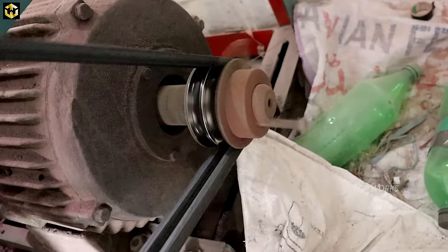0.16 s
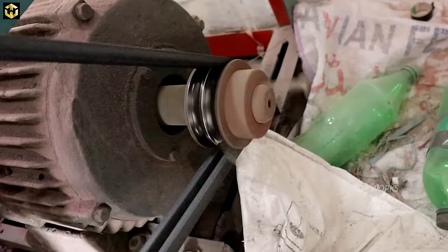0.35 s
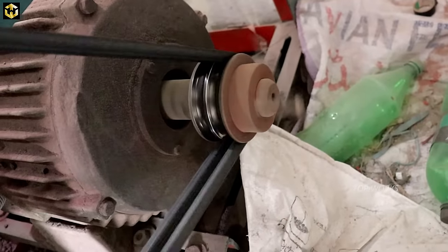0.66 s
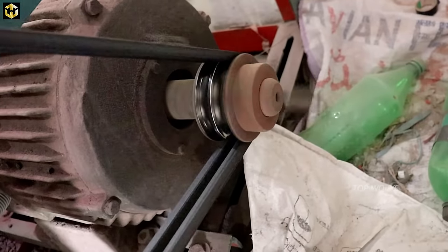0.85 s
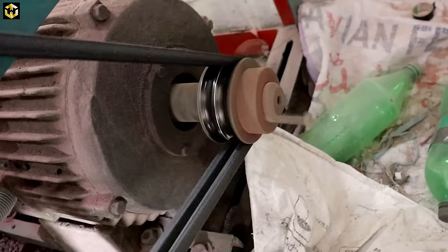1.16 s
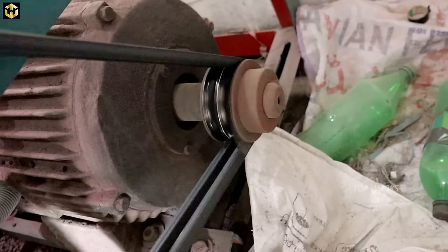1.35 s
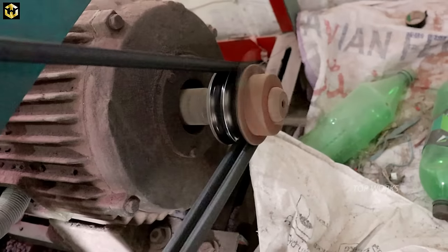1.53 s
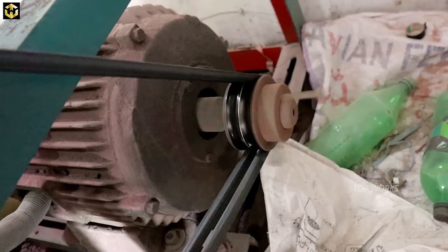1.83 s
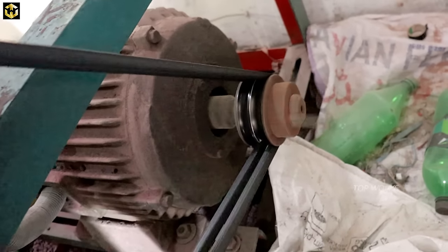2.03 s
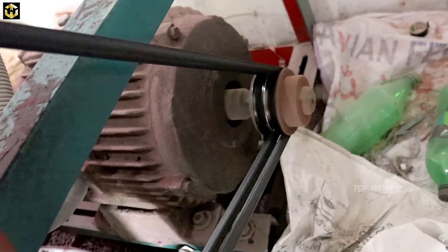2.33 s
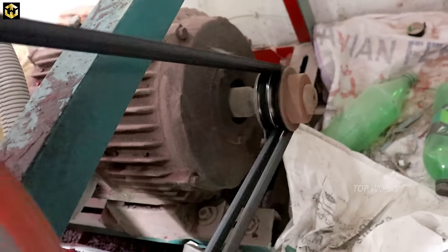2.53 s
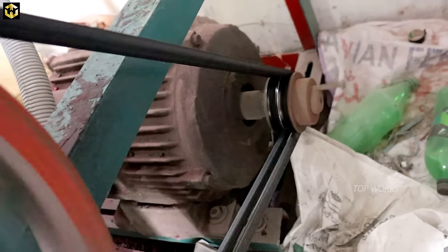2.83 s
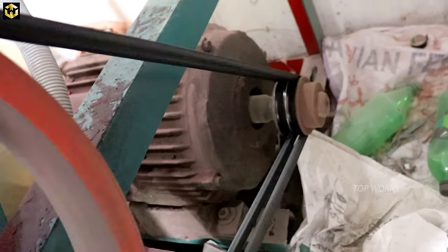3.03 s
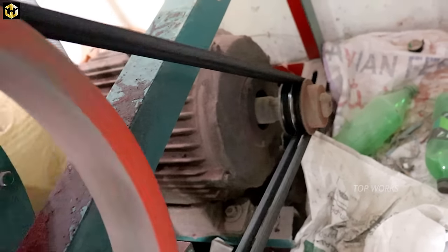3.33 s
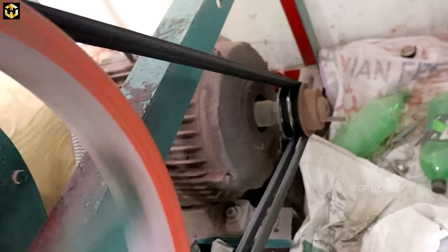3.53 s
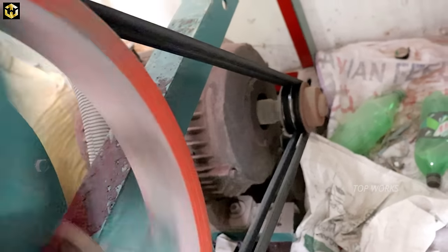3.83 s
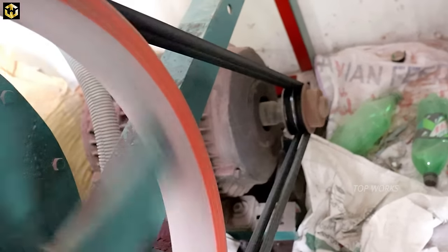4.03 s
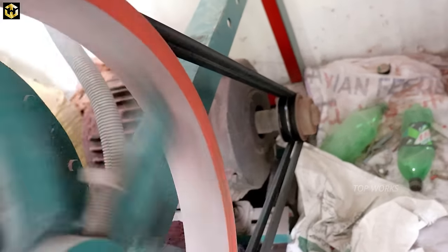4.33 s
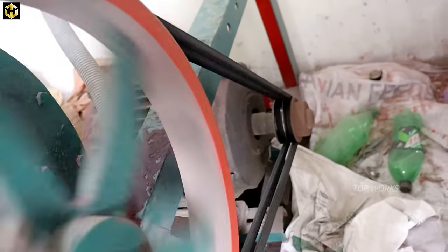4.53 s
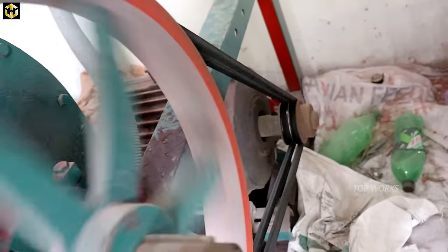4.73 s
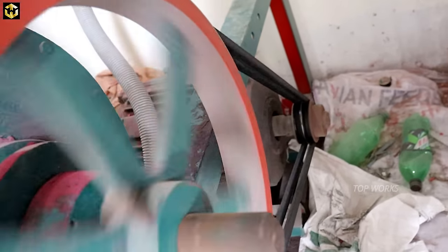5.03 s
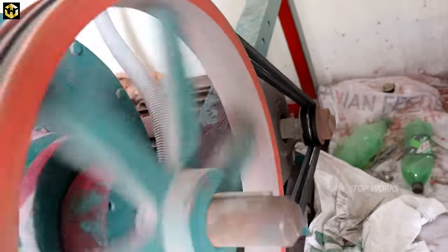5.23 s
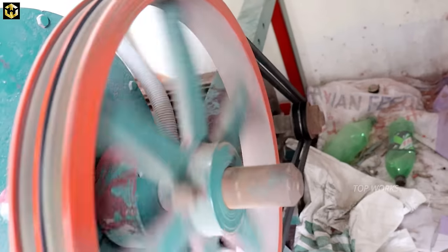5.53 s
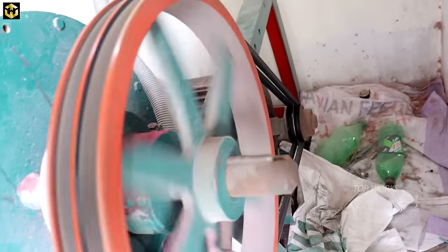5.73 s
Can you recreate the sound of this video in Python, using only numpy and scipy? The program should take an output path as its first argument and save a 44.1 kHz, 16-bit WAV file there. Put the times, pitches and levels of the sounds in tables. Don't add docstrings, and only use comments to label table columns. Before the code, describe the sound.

Steady motor and drum noise with uneven swishing, clattering tumbles and small steel rings, starting full and turning thinner and quieter.

```python
import sys
import numpy as np
from scipy import signal
from scipy.io import wavfile
from scipy.ndimage import uniform_filter1d

SR = 44100
rng = np.random.default_rng(int(sys.argv[2]) if len(sys.argv) > 2 else 0)


def invert_db(level):
    return 10 ** (np.asarray(level, dtype=float) / 20)


def waveform_to_disk(signal):
    frames = np.transpose(np.atleast_2d(signal))
    scaled = np.clip(frames, -1, 1) * 32767
    samples = np.round(scaled).astype(np.int16)
    wavfile.write(sys.argv[1], SR, samples)


N = 259308


def evened(x):
    return x / np.sqrt(np.mean(x ** 2) + 1e-20)


def read(points, hz):
    f, value = np.transpose(points)
    return np.interp(np.log(hz + 1), np.log(f + 1), value)


def add(mix, start_s, sound):
    part = mix[max(round(start_s * SR), 0):][:len(sound)]
    part += sound[:len(part)]


def patches(frames, bins, long, wide):
    noise = rng.standard_normal((frames, bins))
    return evened(uniform_filter1d(uniform_filter1d(noise, long, 0), wide, 1)).T


def away(t):
    return np.clip(t / 3.65, 0, 1)


# hz, likeness
LIKENESS = [(60, 0.43), (150, 0.89), (380, 0.52), (950, 0.0035), (2380, -0.01), (5980, 0.00072),
            (15000, -0.12)]


def port_noise(frames, hz):
    lead_s = 0.00021
    a, b, c, d = rng.standard_normal((frames, len(hz), 4)).T
    same = np.sqrt(np.clip(read(LIKENESS, hz), 0, 1))[:, None]
    left = a + 1j * b
    late = np.exp(-2j * np.pi * lead_s * hz)[:, None]
    right = same * left * late + np.sqrt(1 - same ** 2) * (c + 1j * d)
    return np.array([left, right]), same


# hz, width_hz, near_motor_db, near_wheel_db
SHELL = [(71, 10, 6, 4.5), (109, 11, 3, 7.5), (159.6, 4.4, 11, 13), (217.5, 9, 12, 1), (286, 7.7, 4, 4.5),
         (323.5, 13, 11, 0), (332, 21, -7, 9.5), (474, 7.8, 5, -12), (537, 28, 7, -3), (647, 26, 8, 2),
         (722, 19, 7, 8.5), (820, 11, -1, 6), (873, 12, 4.5, -6), (997, 25, 5.5, 0), (1100, 6.3, 11, 3),
         (1235, 15, 12.5, 5.5), (1290, 18, -1, 6), (1524, 17, 3.5, 6), (1640, 9.2, 4, 7), (1933, 57, 1, 1),
         (2070, 16, -1, 3.5), (2118, 24, 4.5, -0.5), (2240, 15.5, 3, -2.5), (3010, 25, -4, -12)]


def shell_power(hz, t, hop):
    waver_db = 3
    f, width_hz, near_db, far_db = np.transpose(SHELL)
    mode_db = near_db[:, None] + np.outer(far_db - near_db, away(t))
    mode_db = mode_db + waver_db * patches(len(t), len(f), round(4000 / hop), 1)
    peaks = 1 / (1 + (2 * (hz[:, None] - f) / width_hz) ** 2)
    return 1 + peaks @ invert_db(2 * mode_db)


# start_s, length_s, thump_db, splash_db
TUMBLES = [(0.225, 0.092, 2, 2.5), (0.39, 0.018, 2, 0), (0.64, 0.04, -0.5, 2.5), (0.804, 0.052, -1.5, -2.5),
           (0.848, 0.049, 4.5, -2.5), (1.126, 0.08, 3, 0), (1.334, 0.049, 1, 3.5), (1.495, 0.11, -5, -1),
           (1.68, 0.066, 3.5, 5), (1.897, 0.072, 2.5, 1), (2.18, 0.054, -2, -3.5), (2.334, 0.11, 4, 2),
           (2.475, 0.091, -1, 0.5), (2.575, 0.089, 4, 3.5), (2.85, 0.073, 4, 5), (3.008, 0.052, -4, -4),
           (3.111, 0.087, 4.5, 3), (3.548, 0.038, -1.5, 5), (3.607, 0.14, 7, 3.5), (3.765, 0.067, -3, -3.5),
           (3.835, 0.039, -6.5, 2.5), (4.062, 0.078, 6, 4), (4.19, 0.044, 6, 0.5), (4.38, 0.1, 2.5, 2.5),
           (4.592, 0.042, 1, 3.5), (4.77, 0.073, -3.5, 1), (4.965, 0.13, 4.5, -1), (5.21, 0.1, 6.5, 1.5),
           (5.406, 0.033, -1, 6.5), (5.5, 0.15, 0, -6.5)]


def tumbling(t):
    drop_s, settle_s = 0.011, 0.038
    start_s, length_s, *db = np.transpose(TUMBLES)
    since = t - start_s[:, None]
    rise = np.clip(since / drop_s + .5, 0, 1)
    settle = np.clip(1 - (since - length_s[:, None]) / settle_s, 0, 1)
    return np.array(db) @ (rise * settle)


# time_s, centre_hz
HOLLOW = [(0, 1720), (1.2, 1770), (2.2, 2170), (3.2, 1800), (4.3, 1820), (5.88, 1760)]


def mouth_power(hz, t):
    width_hz, sink_hz_per_db = 750, 6
    thump_db, splash_db = tumbling(t)
    centre_hz = np.interp(t, *np.transpose(HOLLOW)) - sink_hz_per_db * thump_db
    height_db = 5.5 - 0.58 * thump_db + 0.56 * splash_db
    return invert_db(2 * height_db / (1 + (2 * (hz[:, None] - centre_hz) / width_hz) ** 2))


# time_s, turned_away_db, right_port_shade_db
TURN = [(0, -0.5, 1.5), (1.2, 1.5, -0.5), (1.7, 0.7, -1), (2.05, -2, 5), (2.3, -2, 3), (2.75, -2, 6),
        (3.25, -1.5, 6), (3.55, -3, 3.5), (4.2, -1.5, 3.5), (4.75, -5, 2), (5.12, -2.5, 1), (5.45, -5, 2),
        (5.88, -6, -2)]
TURN_AT = [450, 750, 1700, 4000, 9000]
# start_left_minus_right_db, turn_share, shade_share
PORTS = [(7, 0.17, -0.054), (4, 1.3, 1.04), (4, 1.06, 0.064), (5, 0.071, 1.1)]


def port_difference_db(hz, t):
    time_s, turn_db, shade_db = np.transpose(TURN)
    bands = [0 * t]
    for start_db, turn_share, shade_share in PORTS:
        bands.append(np.interp(t, time_s, start_db + turn_share * turn_db + shade_share * shade_db))
    return np.array([np.interp(np.log(hz + 1), np.log(TURN_AT), row) for row in np.array(bands).T]).T


# centre_s, length_s, centre_hz, level_db
SWELLS = [(0.13, 0.09, 310, -1), (0.16, 0.061, 464, 7), (0.66, 0.09, 387, 11.5), (0.77, 0.068, 2120, 4),
          (1.12, 0.09, 1080, 5), (1.26, 0.056, 580, 7), (1.35, 0.12, 234, 2.5), (1.57, 0.18, 780, 5),
          (1.57, 0.12, 5500, 2.5), (1.58, 0.14, 1470, 4.5), (1.61, 0.054, 290, 5.5), (2.23, 0.16, 3530, -1),
          (2.86, 0.07, 1410, 7), (2.93, 0.13, 820, 7), (3.27, 0.064, 332, 5.5), (3.3, 0.1, 2380, 1),
          (3.3, 0.094, 10830, 5), (3.36, 0.051, 3770, 4), (3.42, 0.058, 352, 9), (3.59, 0.19, 520, 5.5),
          (3.84, 0.1, 240, 7), (3.86, 0.059, 1710, 3), (4.14, 0.096, 240, 7.5), (4.39, 0.13, 7160, 5),
          (4.49, 0.1, 1010, 2.5), (4.59, 0.18, 430, -3), (4.68, 0.13, 494, 6), (4.72, 0.074, 11570, 6),
          (4.85, 0.16, 5950, 4), (5.24, 0.17, 1020, 2), (5.35, 0.084, 2710, 2), (5.42, 0.084, 5960, 1),
          (5.43, 0.12, 1700, -3), (5.53, 0.11, 2230, 5), (5.67, 0.12, 403, 6), (5.68, 0.089, 3740, 3.5),
          (5.79, 0.12, 1200, 4), (5.88, 0.056, 240, 12)]
# centre_s, length_s, centre_hz, level_db
LULLS = [(0.26, 0.079, 1140, -2), (0.78, 0.13, 243, -5), (0.81, 0.22, 490, -1.5), (1.01, 0.25, 610, -6),
         (1.15, 0.54, 460, -4.5), (1.46, 0.16, 2780, -4), (1.76, 0.086, 1260, -7), (1.97, 0.11, 350, -3),
         (2.1, 0.076, 10140, -3.5), (2.15, 0.092, 590, -8), (2.24, 0.068, 1240, -4.5),
         (2.46, 0.055, 3750, -2), (2.53, 0.089, 426, -20), (2.61, 0.1, 960, -5.5), (2.77, 0.11, 830, -6),
         (2.87, 0.09, 330, -13), (2.94, 0.11, 2380, -3), (2.94, 0.17, 288, 1), (3.11, 0.11, 5250, -4.5),
         (3.17, 0.065, 2110, -6), (3.52, 0.14, 5600, -5), (3.65, 0.08, 10140, -6), (3.96, 0.085, 490, 0),
         (4.0, 0.08, 241, -9), (4.15, 0.11, 710, -10), (4.21, 0.15, 2440, -4), (4.5, 0.11, 240, -7),
         (4.61, 0.093, 1010, -7), (4.62, 0.16, 3000, -3), (4.85, 0.18, 740, -6), (5.0, 0.09, 240, -5),
         (5.07, 0.067, 1400, -6), (5.19, 0.15, 2230, -4.5), (5.34, 0.12, 8300, -6), (5.58, 0.09, 290, -4),
         (5.78, 0.14, 11300, -6), (5.88, 0.062, 1690, -9), (5.88, 0.16, 6390, -7)]


def heaps_db(hz, t):
    region_octaves = 0.46
    centre_s, length_s, centre_hz, level_db = np.transpose(list(SWELLS) + list(LULLS))
    octaves = np.log2((hz[:, None] + 1) / centre_hz)
    across = np.exp(-np.log(16) * (octaves / region_octaves) ** 2)
    along = np.exp(-np.log(16) * ((t - centre_s[:, None]) / length_s[:, None]) ** 2)
    return across * level_db @ along


def roar(colour_db, size, count, patch_db, broad_db, gust_db, own_db):
    hop = size // 4
    frames, hz = N // hop + 5, np.fft.rfftfreq(size, 1 / SR)[:count]
    t, bin_hz = np.arange(frames) * hop / SR, SR / size
    z, same = port_noise(frames, hz)
    ring = shell_power(hz, t, hop) * mouth_power(hz, t)
    small = patch_db * patches(frames, len(hz), round(3500 / hop), round(150 / bin_hz))
    broad = broad_db * patches(frames, len(hz), round(3000 / hop), round(1500 / bin_hz))
    gust = gust_db * patches(frames, 1, round(1200 / hop), 1)
    own = own_db * patches(frames, len(hz), round(3000 / hop), round(600 / bin_hz)) * (1 - same)
    lean = port_difference_db(hz, t) / 2 + own
    z *= np.sqrt(ring) * invert_db(colour_db(hz, t) + small + broad + gust + np.array([lean, -lean]))
    power = uniform_filter1d((abs(z.mean(0)) ** 2).sum(0), size=round(4500 / hop)) / 3
    z *= invert_db(heaps_db(hz, t)) / np.sqrt(power + 1e-20)
    z = np.pad(z, [(0, 0), (0, size // 2 + 1 - count), (0, 0)])
    return signal.istft(z, nperseg=size, noverlap=size - hop)[1][:, :N]


# hz, level_db
RUMBLE = [(15, -45), (25, -23), (102, -6), (156, -1.5), (177, -2.5), (216, -12.5), (260, 6.5), (340, -30),
          (570, -120)]
BODY_NEAR = [(120, -46), (200, -12.5), (313, -1), (435, -6), (524, 1), (567, -3), (851, 5), (1100, -7.5),
             (1430, -22), (2420, -120)]
BODY_FAR = [(120, -23), (200, -10.5), (296, -12), (334, -5), (372, -7.5), (827, 0.5), (914, -1.5),
            (1100, 1.5), (1430, -28), (2420, -120)]
SWISH_NEAR = [(530, -25), (900, 0), (1160, -6.5), (1260, 1.5), (1410, -3), (1610, -2.5), (2900, -7),
              (3770, -36), (6380, -120)]
SWISH_FAR = [(530, -42), (900, -7.5), (1270, -0.5), (1380, -1.5), (1680, -2), (2170, -7), (2900, -17.5),
             (3770, -30), (6380, -120)]
HISS_NEAR = [(1350, -21.5), (2300, -2), (2860, -4), (3090, -2), (5250, -6.5), (6790, -13), (10100, -18.5),
             (11500, -22.5), (14400, -26), (15600, -29)]
HISS_FAR = [(1350, -37), (2300, -1.5), (3630, -1), (3970, -2.5), (5340, -3), (6840, -8), (7540, -10),
            (10200, -14), (12100, -22), (15600, -24.5)]
# time_s, gain_db
TURNED_DOWN = [(0, 0.5), (.33, 0.5), (.7, -1), (1.05, -3.5), (1.5, -5.5), (2, -8), (2.5, -10), (3, -11.5),
               (3.5, -13), (4, -14), (4.5, -15.5), (5, -15.5), (5.4, -16.5), (5.7, -16), (5.88, -13)]
# start_db, turn_down_share, lowest_db, thump_share, splash_share
PARTS = [(-45.5, 2.9, -69.5, 0.19, 0.13), (-33.5, 1.488, -62, 0.97, 0.046), (-33, 0.92, -55, 0.096, 0.42),
         (-33, 0.76, -55, 0.026, 0.28)]


def machine():
    def moving(near, far):
        return lambda hz, t: np.outer(read(near, hz), 1 - away(t)) + np.outer(read(far, hz), away(t))

    parts = [
        roar(moving(RUMBLE, RUMBLE), size=4096, count=60,
             patch_db=0.5, broad_db=-1.5, gust_db=2.5, own_db=-2.0),
        roar(moving(BODY_NEAR, BODY_FAR), size=2048, count=110,
             patch_db=1.03, broad_db=-0.1, gust_db=-0.77, own_db=-0.5),
        roar(moving(SWISH_NEAR, SWISH_FAR), size=2048, count=290,
             patch_db=0.96, broad_db=0.5, gust_db=0.0, own_db=2.0),
        roar(moving(HISS_NEAR, HISS_FAR), size=1024, count=380,
             patch_db=1.47, broad_db=0.58, gust_db=0.47, own_db=1.04)]
    t = np.arange(0, N, 32) / SR
    down_db = np.interp(t, *np.transpose(TURNED_DOWN))
    thump_db, splash_db = tumbling(t)
    out = np.zeros((2, N))
    for x, (start_db, share, lowest_db, thump_share, splash_share) in zip(parts, PARTS):
        level_db = np.maximum(start_db + share * down_db, lowest_db)
        level_db = level_db + thump_share * thump_db + splash_share * splash_db
        out += np.interp(np.arange(N) / SR, t, invert_db(level_db)) * x
    return out


def rattle():
    jolts_per_s, jolt_db, decay_s = 220, 1.1, .002
    chance, size = rng.random(N), rng.exponential(1, N)
    hits = np.minimum(size, 3) * (chance < jolts_per_s / SR)
    jolts = signal.lfilter([1], [1, -np.exp(-1 / (decay_s * SR))], hits)
    return evened(invert_db(jolt_db * jolts))


def narrow(table, flutter_db):
    out, (a, b) = np.zeros(N), rng.standard_normal((2 * N + SR, 2)).T
    flutter = invert_db(flutter_db * evened(uniform_filter1d(a, 2500)))
    lead = SR // 4
    for k, (start_s, end_s, hz, width_hz, level_db) in enumerate(table):
        t = np.arange(round((end_s - start_s) * SR)) / SR
        part = slice(k * lead, (k + 1) * lead + len(t))
        lowpass = signal.butter(2, width_hz / 2, fs=SR, output="sos")
        slow = signal.sosfilt(lowpass, a[part] + 1j * b[part])[lead:]
        slow = slow / np.sqrt(uniform_filter1d(abs(slow) ** 2, size=5000, mode="nearest") + 1e-20)
        band = (slow * np.exp(2j * np.pi * hz * t)).real * flutter[part][lead:]
        add(out, start_s, invert_db(level_db) * evened(band) * signal.windows.tukey(len(t), .6))
    return out


# start_s, end_s, pitch_hz, width_hz, level_db
SURGES = [(.05, 0.51, 74, 9, -52), (0, .35, 535, 60, -44), (1.22, 1.45, 520, 120, -50),
          (.8, 1.26, 318, 4, -47), (1.3, 1.5, 107, 4.4, -60.5), (1.8, 2.2, 108, 6, -63.5),
          (1.1, 2.25, 800, 120, -53), (.08, .15, 1240, 12, -42), (.3, 0.68, 1238, 5, -41),
          (.88, 1.22, 1245, 30, -49), (1.42, 1.54, 1255, 25, -46), (1.84, 1.98, 1240, 30, -49),
          (2.32, 2.44, 1270, 30, -50), (3.66, 3.76, 1300, 25, -51), (3.53, 4.3, 336, 13, -67.5),
          (.11, 0.43, 390, 230, -40), (0.47, 0.74, 210, 31, -48), (3, 3.7, 210, 9, -69.5),
          (5.765, 5.885, 1150, 720, -42.5), (4.97, 5.09, 600, 420, -54), (5.19, 5.29, 1250, 600, -51),
          (5.79, 5.9, 335, 33, -58), (2.84, 2.97, 160, 14, -64), (4.84, 4.92, 330, 75, -63),
          (3.91, 3.98, 335, 15, -61), (4.55, 4.63, 335, 15, -62), (5.33, 5.42, 330, 15, -63),
          (4.19, 4.25, 335, 20, -59), (2.58, 2.78, 1150, 40, -56), (2.7, 2.8, 1640, 30, -52),
          (3.18, 3.3, 1950, 30, -53), (1.25, 1.4, 2150, 60, -47), (.0, .22, 745, 10, -42),
          (.26, .66, 875, 12, -44), (.36, .44, 1022, 20, -43), (1.52, 1.64, 1100, 120, -49),
          (.86, 1.06, 1400, 80, -49), (1.55, 1.65, 160, 12, -60), (4.18, 4.25, 152, 14, -63)]


def surges():
    return narrow(SURGES, flutter_db=1.0)


# start_s, end_s, pitch_hz, width_hz, level_db
HUMS = [
    (.27, 0.42, 520, 46, -45),
    (.13, 0.22, 270, 20, -44),
    (.62, 1.06, 720, 18, -49.5),
    (4.6, 4.94, 158, 16, -64.5),
    (5.05, 5.24, 155, 15, -65),
    (4.45, 4.63, 455, 11, -67),
    (3, 2.38, 630, 60, -46),
    (0, 0.33, 4500, 2900, -48),
]


def hums():
    return narrow(HUMS, flutter_db=1.0)


# start_s, end_s, pitch_hz, width_hz, level_db
WHISTLES = [(0.018, 1.77, 10200, 770, -54.5), (2.4, 3.02, 10200, 650, -57), (2.7, 4.25, 10200, 960, -55),
            (3.05, 4.03, 7300, 480, -57), (3, 3.9, 8300, 350, -64), (4.48, 4.68, 5400, 650, -51.5),
            (4.8, 4.94, 4800, 700, -54), (4.56, 4.62, 7400, 580, -49), (4.69, 4.74, 6900, 450, -58),
            (5.37, 5.46, 1650, 330, -50), (4.8, 4.93, 5200, 800, -50), (1.95, 2.42, 3650, 900, -43.5),
            (5.34, 5.48, 5500, 1200, -53), (4.59, 4.65, 1650, 360, -45), (3.22, 3.36, 2200, 610, -46),
            (3.02, 3.12, 2000, 520, -47), (5.3, 5.38, 2750, 500, -50), (2.75, 2.83, 1800, 400, -46),
            (2.3, 2.75, 6500, 1800, -51), (4.22, 4.32, 1700, 350, -49), (4.04, 4.12, 1750, 500, -49),
            (2.57, 2.65, 1550, 300, -46), (3.62, 3.7, 1620, 200, -50)]


def whistles():
    return narrow(WHISTLES, flutter_db=3.0)


# start_s, peak_db, pitch_hz
PINGS = [(0.079, -28, 730), (0.106, -16.5, 1245), (0.39, -16, 1244), (0.506, -19, 1250), (1.12, -22, 1220),
         (1.465, -28, 1280), (1.87, -25.5, 1217), (2.069, -25, 2280), (2.143, -25, 1264),
         (2.335, -26, 1290), (2.517, -30, 2060), (2.592, -26, 1555), (2.701, -28, 1920), (2.789, -26, 1870),
         (2.922, -30, 1290), (3.022, -31, 1860), (3.082, -32, 1940), (3.176, -29, 1250), (3.373, -31, 1630),
         (3.83, -31, 1640), (3.879, -30, 1750), (4.065, -32, 1560), (4.376, -31, 1480), (4.601, -33, 1560),
         (4.626, -32, 1550), (4.838, -34, 1760), (5.338, -33, 2460), (5.419, -29.5, 1640),
         (5.775, -31, 1496), (5.799, -29, 1225)]


def pings():
    rise_s, t60_s, level_db, pair_ratio = 0.0012, 0.13, -12.5, 1.04
    out, t = np.zeros(N), np.arange(6000) / SR
    shape = (1 - np.exp(-t / rise_s)) * invert_db(-60 * t / t60_s)
    for (start_s, peak_db, hz), turn in zip(PINGS, rng.random(len(PINGS))):
        ring = np.sin(2 * np.pi * hz * t) + .5 * np.sin(2 * np.pi * (pair_ratio * hz * t + turn))
        add(out, start_s, invert_db(peak_db + level_db) * shape / shape.max() * ring)
    return out


def blows(events, modes, rise_s, held_s):
    out, t = np.zeros(N), np.arange(SR // 2) / SR
    shape = (1 - np.exp(-t / rise_s)) / (1 + np.exp((t - held_s) / .012))
    ring = np.zeros(len(t))
    for k, (hz, level_db, t60_s) in enumerate(modes):
        ring += (-1) ** k * invert_db(level_db - 60 * t / t60_s) * np.sin(2 * np.pi * hz * t)
    ring *= shape
    for start_s, peak_db in events:
        add(out, start_s, invert_db(peak_db) * ring / abs(ring).max())
    return out


# start_s, peak_db
KNOCKS = [(0.218, -28.5), (0.549, -36), (2.885, -70), (3.149, -49.5), (3.63, -52), (3.82, -50),
          (4.068, -36), (4.588, -53), (4.839, -50.5), (5.18, -58), (5.329, -51), (5.67, -55)]
# pitch_hz, level_db, t60_s
KNOCK_MODES = [
    (152, -2, .5),
    (169, 0, .4),
    (330, -16, .2),
]


def knocks():
    return invert_db(-5.0) * blows(KNOCKS, KNOCK_MODES, rise_s=0.026, held_s=0.21)


# start_s, peak_db, treble_share
SLAPS = [(0.2399, -20, 0.3), (0.3466, -26, .5), (0.6439, -26, 0.6), (0.7771, -28, .5), (1.4546, -37, .5),
         (2.1465, -39, .5), (2.3394, -29, 0.4), (2.367, -29, 0.4), (3.1113, -43, .5), (4.3066, -28, .5),
         (5.2789, -39, .5), (5.6735, -42, .5), (2.5795, -22, 0.2), (3.22, -18.5, 0.6), (3.5586, -27, 0.6),
         (4.0594, -30, 0.5), (4.3784, -26, 0.4), (4.5894, -28, 0.3), (4.835, -29, 0.3), (5.335, -40, 0.3),
         (5.413, -39, 0.2), (5.792, -25, 0)]


def slaps():
    out, t = np.zeros(N), np.arange(3000) / SR
    for start_s, peak_db, treble in SLAPS:
        noise = rng.standard_normal(len(t))
        treble = np.clip(treble, 0, 1)
        burst = signal.lfilter([1, -treble], [1, -.8 * (1 - treble)], noise)
        add(out, start_s, invert_db(peak_db - 15.5 - 60 * t / 0.076) * evened(burst))
    return signal.sosfilt(signal.butter(2, [900, 11000], "band", fs=SR, output="sos"), out)


# start_s, peak_db
THUDS = [
    (0.269, -44),
    (0.896, -48.5),
    (1.379, -63),
    (1.799, -56),
    (2.208, -66),
    (3.653, -65),
    (4.081, -61),
    (4.839, -68),
]
# pitch_hz, level_db, t60_s
THUD_MODES = [
    (73, 0, .8),
]


def thuds():
    return invert_db(-3.0) * blows(THUDS, THUD_MODES, rise_s=0.021, held_s=0.16)


# end_s, length_s, dip_db
HITCHES = [
    (4.375, 0.014, -2),
    (4.055, .02, 0),
    (2.578, 0.015, -1.5),
]


def hitches():
    t = np.arange(N) / SR
    dip_db = np.zeros(N)
    for end_s, length_s, db in HITCHES:
        corners_s = [end_s - 2 * length_s, end_s - length_s, end_s - .002, end_s]
        dip_db += db * np.interp(t, corners_s, [0, 1, 1, 0])
    return invert_db(dip_db)


def scene():
    low = knocks() + thuds() + surges() + hums() + pings()
    high = whistles() + slaps()
    low_ports = low * invert_db(np.array([[.6], [-.6]]))
    high_ports = high * invert_db(np.array([[4.0], [-12.0]]))
    return machine() * hitches() * rattle() + low_ports + high_ports


def suppressed(x, strength):
    edge_hz = 15760
    hz, _, z = signal.stft(x, SR, nperseg=2048, noverlap=1536)
    power = abs(z) ** 2 + 1e-20
    around = uniform_filter1d(uniform_filter1d(power, size=21, axis=1), size=9, axis=2) + 1e-20
    gain = np.clip(power / around, .02, 5) ** (strength * (1 + hz[:, None] / 6000))
    gain = gain * (hz < edge_hz)[:, None]
    return signal.istft(z * gain, SR, nperseg=2048, noverlap=1536)[1][:, :N]


def band_limit(x):
    return signal.sosfilt(signal.butter(12, 15780, fs=SR, output="sos"), x)


def record(dry):
    thin = signal.sosfilt(signal.butter(3, 50, "high", fs=SR, output="sos"), dry)
    thin = .5 * np.tanh(2 * thin)
    mix = suppressed(thin, strength=0.044)
    return band_limit(mix)


dry = scene()
out = record(dry)
waveform_to_disk(out)
```